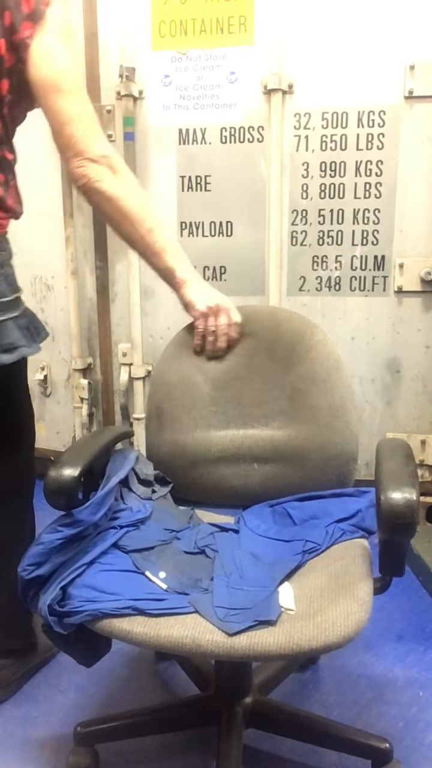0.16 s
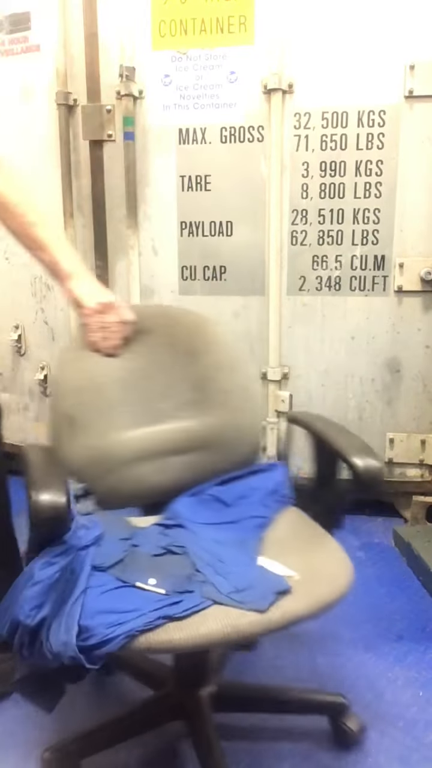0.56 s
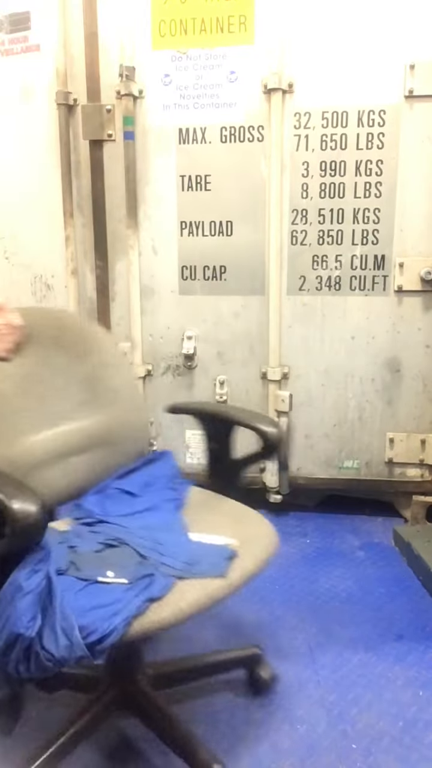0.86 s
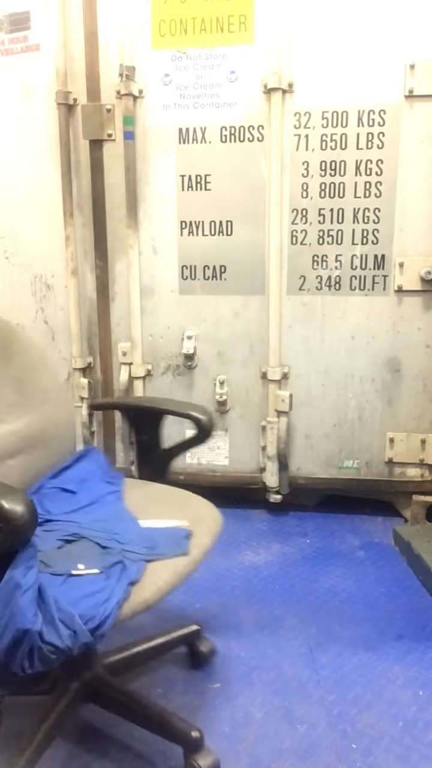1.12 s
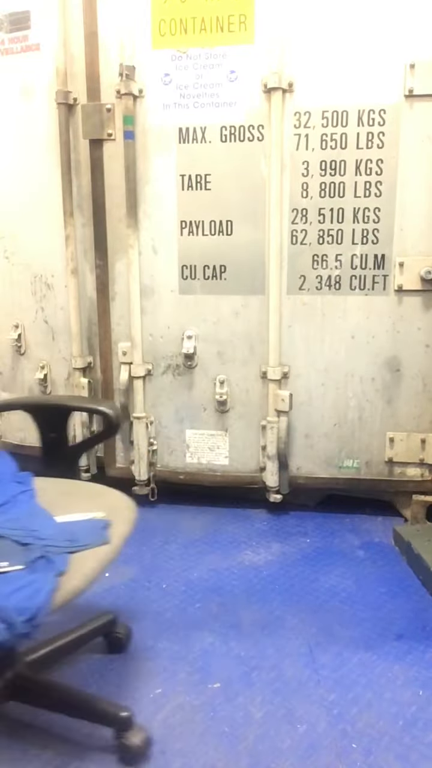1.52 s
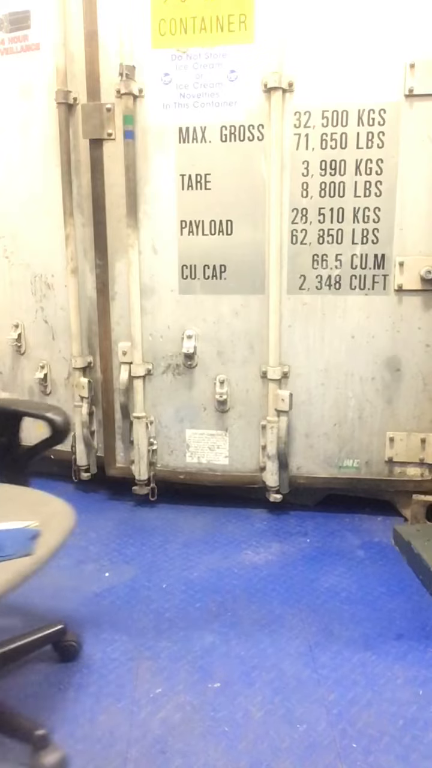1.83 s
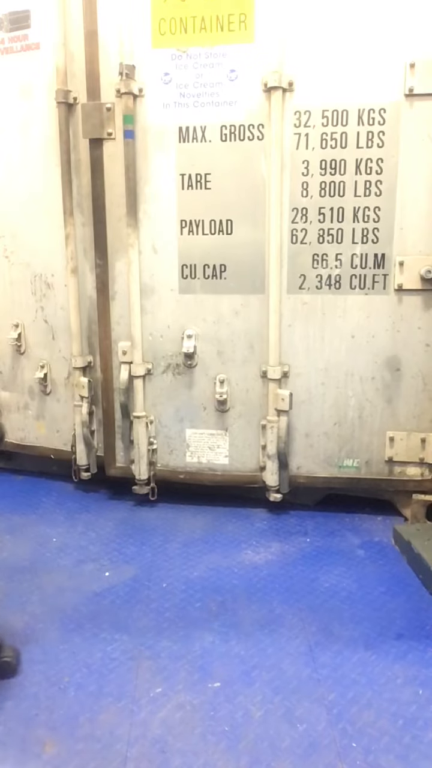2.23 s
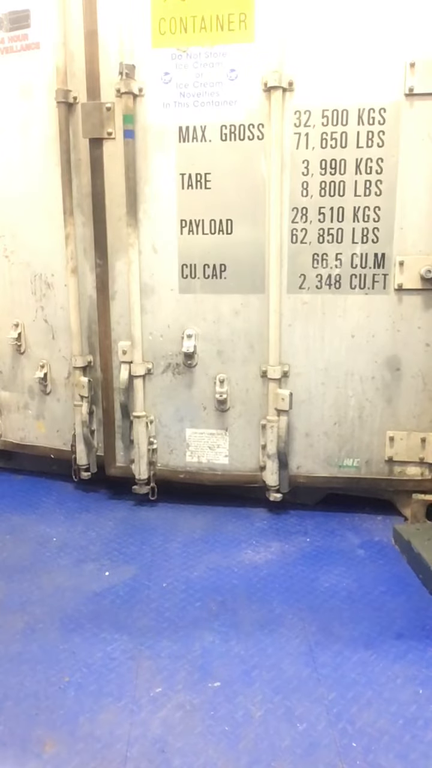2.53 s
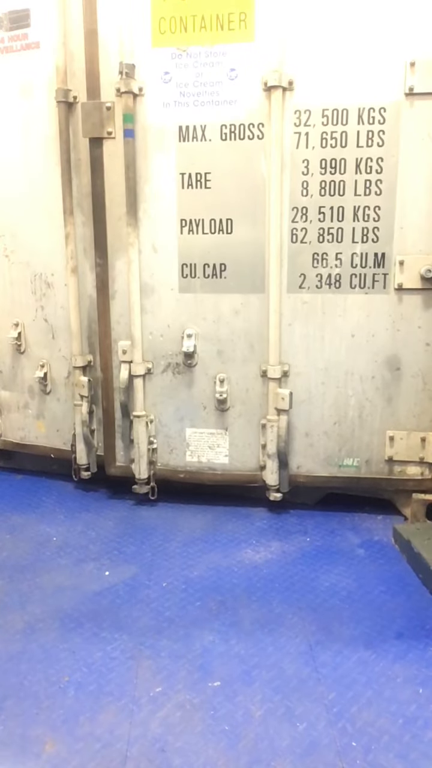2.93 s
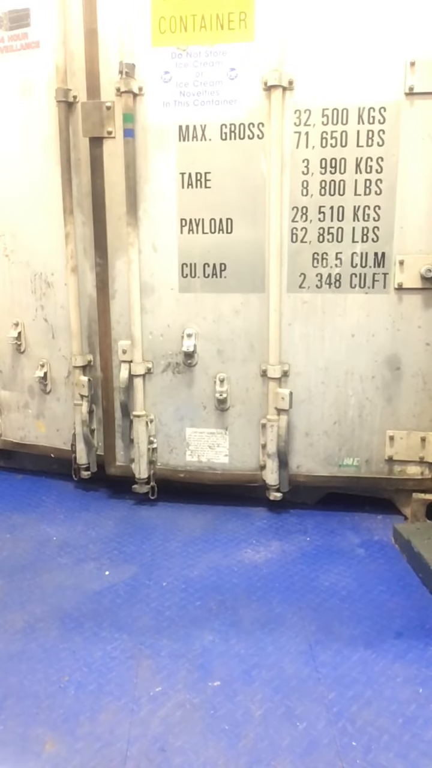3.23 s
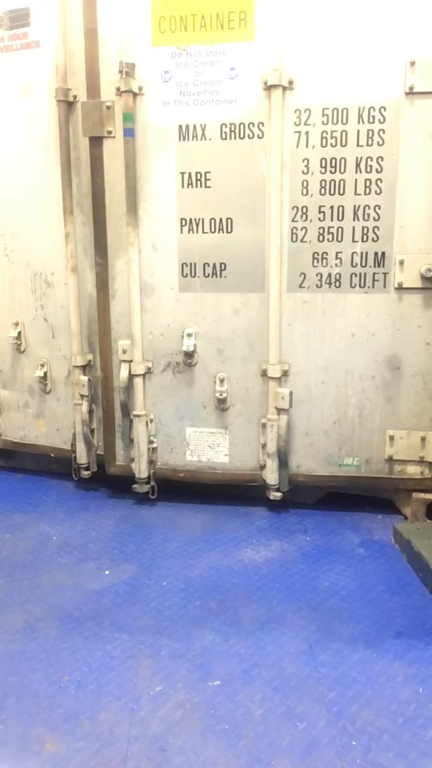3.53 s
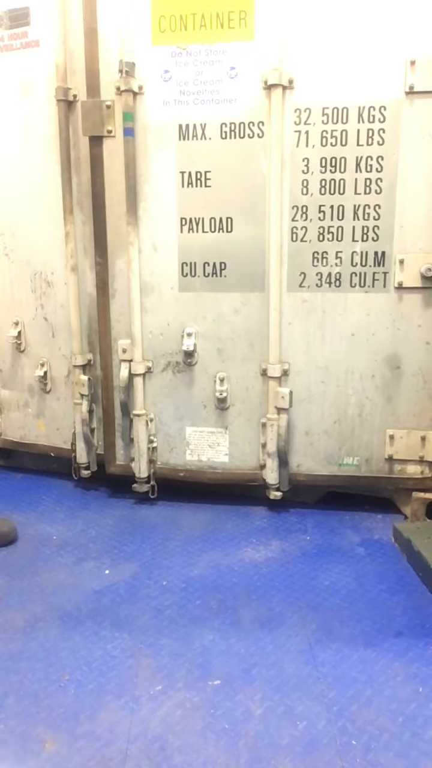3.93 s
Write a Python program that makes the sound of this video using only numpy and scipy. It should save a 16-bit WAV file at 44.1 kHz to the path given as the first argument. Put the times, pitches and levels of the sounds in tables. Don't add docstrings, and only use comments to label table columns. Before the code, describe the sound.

An office chair on hard plastic casters is pulled over a studded floor in a hard-walled store room. Low thuds, hollow knocks and rattling axles come densely, with brief squeaks and ticks. After about three seconds the rolling dies, loose parts settle with a small final knock, and low rumble and air remain. A phone microphone hears little deep bass.

```python
import sys
import numpy as np
from scipy import signal
from scipy.fft import rfft, irfft, next_fast_len
from scipy.io import wavfile
from scipy.ndimage import uniform_filter1d, map_coordinates

SR = 44100
rng = np.random.default_rng(int(sys.argv[2]) if len(sys.argv) > 2 else 0)


def log_audio(samples):
    frames = np.atleast_2d(samples).T
    limited = np.clip(frames, -1, 1)
    pcm = np.round(limited * 32767).astype(np.int16)
    wavfile.write(sys.argv[1], SR, pcm)


def voltage_ratio(level):
    return 10 ** (np.asarray(level, float) / 20)


N = 179090
TIME_S = np.arange(N) / SR


def unit(x):
    return x / np.sqrt(np.mean(x ** 2) + 1e-20)


def along(points, hz):
    f, v = np.transpose(points)
    return np.interp(np.log(hz + 1), np.log(f + 1), v)


def curves(rows, before=None, after=None):
    s, *columns = np.transpose(rows)
    return [np.interp(TIME_S, s, c, before, after) for c in columns]


def wobble(rate_hz):
    knots = rng.standard_normal(int(N * rate_hz / SR) + 4)
    return map_coordinates(knots, [np.arange(N) * rate_hz / SR])


def filtered(x, response):
    m = next_fast_len(N + SR // 2)
    return irfft(rfft(x, m) * response(np.fft.rfftfreq(m, 1 / SR)), m)[..., :N]


def modes(table):
    def response(f):
        total = 0
        for k, (hz, width_hz, db) in enumerate(table):
            resonance = 1j * f * width_hz / (hz * hz - f * f + 1j * f * width_hz)
            total = total + (-1) ** k * voltage_ratio(db) * resonance
        return total
    return response


def band(x, lo_hz, hi_hz):
    return signal.sosfilt(signal.butter(2, [lo_hz, hi_hz], "band", fs=SR, output="sos"), x)


def hiss(spectrum, patchy_db):
    z = signal.stft(rng.standard_normal(N + 512), nperseg=512)[2]
    field = uniform_filter1d(rng.standard_normal(z.shape), 12, 0)
    field = unit(uniform_filter1d(field, 5, 1))
    x = signal.istft(z * voltage_ratio(patchy_db * field), nperseg=512)[1][:N]
    return unit(filtered(x, lambda hz: voltage_ratio(along(spectrum, hz))))


def wavering(hz, drift_hz, sway_db, rate_hz):
    strength = np.sqrt(2) * voltage_ratio(sway_db * wobble(rate_hz))
    return strength * np.sin(2 * np.pi * np.cumsum(hz + drift_hz * wobble(rate_hz)) / SR)


def swells(rows):
    power = np.zeros(N)
    for s, db, rise_s, fall_s in rows:
        before = (s - TIME_S) / max(rise_s, .001)
        after = (TIME_S - s) / max(fall_s, .001)
        power += voltage_ratio(2 * db - 20 * np.where(TIME_S < s, before, after))
    return np.sqrt(power)


# (frequency [Hz], density [dB per Hz])
RUMBLE_SPECTRUM = [(38, -46), (65, 3), (140, 1), (190, -7.5), (250, -11), (420, -120)]
# (frequency [Hz], density [dB per Hz])
AIR_SPECTRUM = [(88, -47), (150, -1.5), (333, 0.5), (896, -14), (1070, -12), (2560, -26.5), (3780, -25.5),
                (4160, -31), (5460, -30.5), (10200, -36), (14400, -34), (15600, -47)]
# (time [s], peak [dB], rise for 10 dB [s], fall for 10 dB [s])
HUM_SWELLS = [(1.59, -49, 0.11, .1), (1.82, -55, .06, 0.7), (2.57, -50, .04, -1.2),
              (2.82, -46.5, 0.095, .2), (3.95, -49.5, 0.58, 1.5)]
# (frequency [Hz], width [Hz], level [dB])
MACHINE_MODES = [(719, 47, -7), (915, 340, -15.5), (240, 58, -6)]
# (time [s], level [dB])
DRONE_LEVEL = [
    (3.3, -90),
    (3.55, -68),
    (4.06, -64.5),
]
# (time [s], pitch [Hz], level [dB])
WHINE_TRACK = [
    (3.45, 880, -100),
    (3.54, 865, -69),
    (3.62, 840, -67),
    (3.72, 825, -68),
    (3.82, 870, -82),
    (4.06, 840, -99),
]


def background():
    lift_db = -4.5 + 1.5 * TIME_S
    rumble = voltage_ratio(-57.5 + lift_db + 4.1 * wobble(9.8)) * hiss(RUMBLE_SPECTRUM, patchy_db=2.5)

    air = hiss(AIR_SPECTRUM, patchy_db=0.4)
    low_air = filtered(air, lambda f: 1 / (1 + (f / 1480) ** 2))
    treble_db = 2.5 + 1.02 * TIME_S
    air = voltage_ratio(-67) * (low_air + voltage_ratio(treble_db) * (air - low_air))

    hum = wavering(55, drift_hz=3.58, sway_db=0.0, rate_hz=13)
    hum = np.hypot(voltage_ratio(-69), swells(HUM_SWELLS)) * voltage_ratio(-5.0) * hum

    drone_db, = curves(DRONE_LEVEL)
    drone = unit(filtered(rng.standard_normal(N), lambda f: modes(MACHINE_MODES)(f) ** 2))
    whine_hz, whine_db = curves(WHINE_TRACK)
    whine = wavering(whine_hz, drift_hz=34.6, sway_db=3, rate_hz=80)
    return rumble + air + hum + voltage_ratio(drone_db) * drone + voltage_ratio(whine_db - 3.0) * whine


# (frequency [Hz], t60 [s])
WALL_DECAY = [(200, 1), (2000, 0.3), (10000, 0.4)]


def walls(x):
    hz, t, z = signal.stft(rng.standard_normal(SR // 2), SR, nperseg=256)
    decay = voltage_ratio(-60 * t / along(WALL_DECAY, hz)[:, None])
    tail = signal.istft(z * decay, SR, nperseg=256)[1]
    delayed = np.pad(x, (500, 0))
    return signal.fftconvolve(delayed, tail / np.linalg.norm(tail))[:N]


def stud_hits(per_s, spread_db, rough):
    when = rng.random(N)
    size = np.clip(rng.standard_normal(N), -2, 2)
    hits = (when < per_s / SR) * voltage_ratio(spread_db * size) * rng.choice([-1, 1], N)
    return unit(hits) + rough * rng.standard_normal(N)


def rattle_grains(centre_hz, octaves, cycles, spread_db, tilt_db, count):
    place = rng.random(count)
    pitch, size, life = np.clip(rng.standard_normal((3, count)), -2, 2)
    hz = centre_hz * 2 ** (octaves * pitch)
    k = np.arange(SR // 110)
    turns = hz[:, None] * k / SR
    fade = np.exp(-turns / (cycles * np.exp(0.54 * life))[:, None]) * (1 - np.exp(-turns))
    rings = voltage_ratio(spread_db * size + tilt_db * pitch)[:, None] * fade * np.sin(2 * np.pi * turns)
    samples = (place * N).astype(int)[:, None] + k
    return unit(np.bincount(samples.ravel(), rings.ravel())[:N])


# (time [s], rolling force [dB], axle play [dB])
ROLL = [(0.132, -57, -15), (.2, -44.5, -14), (.31, -41.5, -8), (.37, -45.5, -7), (.59, -33, -8),
        (.72, -34.5, -3.5), (.83, -38.5, -7), (1.08, -40.5, -3.5), (1.2, -43.5, -6.5), (1.37, -42.5, -11.5),
        (1.58, -45.5, -5), (1.95, -38.5, -5.5), (2.23, -39.5, -10.5), (2.39, -44.5, -11.5),
        (2.7, -41.5, -4), (2.98, -46, -10), (3.24, -52.5, -6.5), (3.45, -67, -8.5)]
# (frequency [Hz], width [Hz], level [dB])
BASE_MODES = [(204, 51, -3), (280, 63.7, -1), (346.6, 73.6, -1.5), (457, 102, -6.5), (535, 54.4, -10)]
# (frequency [Hz], width [Hz], level [dB])
WHEEL_MODES = [(633, 107, 3.5), (800, 269, 2.5), (789, 232, 1.5), (1043, 54, -9)]
# (frequency [Hz], width [Hz], level [dB])
HOLLOW_MODES = [(920, 880, -2.5), (1370, 156, 3.5), (1770, 220, 3), (2270, 730, -1.5), (2780, 430, 1),
                (4140, 250, -4), (4630, 790, -13)]
# (frequency [Hz], density [dB per Hz])
TREAD_SPECTRUM = [(2060, -7.5), (3500, 3), (4040, 2.5), (4730, -3), (5590, -3), (5880, -4), (6920, -1.5),
                  (8350, -6.5), (12100, -9.5), (15600, -21)]
# (time [s], peak [dB], rise for 10 dB [s], fall for 10 dB [s])
SKIDS = [(.19, -51, 0.016, 0.09), (.375, -49.5, 0.009, 0.12), (.44, -59, .015, 0.08),
         (.72, -57, 0.17, -0.12), (.83, -57, 0.025, 0.1), (.99, -47.5, 0.029, 0.17),
         (1.45, -58.5, 0.088, 0.8), (1.77, -53, 0.0082, -0.23), (1.93, -46, 0.044, 0.07),
         (2.11, -53.5, 0.0032, 0.05), (2.7, -54.5, 0.17, 0.2), (3.12, -63, 0.027, 0.07)]


def rolling():
    force_db, = curves([row[:2] for row in ROLL], -120, -120)
    play_db = curves(ROLL)[1]
    loose = voltage_ratio(force_db + play_db)
    jolt, flicker = wobble(26.06), wobble(90)
    sway_db = 1.1 * jolt

    studs = stud_hits(per_s=220, spread_db=3, rough=.8)
    drum = unit(filtered(studs, lambda f: modes(BASE_MODES)(f) * f / (f - 120j)))
    drum = voltage_ratio(force_db + sway_db) * drum
    rumble = voltage_ratio(force_db - 13 + 4.3 * wobble(7.65)) * hiss(RUMBLE_SPECTRUM, patchy_db=0.5)

    knock_db = force_db.max() + 0.89 * (force_db - force_db.max()) - 11.5
    wheel_hits = studs + stud_hits(per_s=240, spread_db=4.0, rough=0.61)
    knock = unit(filtered(wheel_hits, modes(WHEEL_MODES)))
    knock = voltage_ratio(knock_db + 1.0 + 2 * sway_db) * knock

    shaken = swells([(s, db - 14, .003, 0.29 / 6) for s, db, _ in AXLE_KNOCKS])
    rattle = rattle_grains(centre_hz=2295, octaves=0.642, cycles=5.4, spread_db=2.5, tilt_db=-0.5, count=5000)
    rattle = rattle + voltage_ratio(-4.5) * walls(rattle)
    rattle = unit(filtered(rattle, lambda f: 0.65 + abs(modes(HOLLOW_MODES)(f))))
    rattle = np.hypot(loose, shaken) * voltage_ratio(-3.5 + jolt / 2 + 1.5 * flicker) * rattle

    skids = swells(SKIDS) * (force_db > force_db.min())
    scuff = np.hypot(voltage_ratio(-17.5) * loose, skids) * voltage_ratio(-1.5 + jolt / 2 + 1.7 * flicker)
    scuff = scuff * hiss(TREAD_SPECTRUM, patchy_db=1.3)
    return drum + rumble + knock + rattle + scuff


def struck_rings(rows, rough, rise_s, wide=.47):
    out, t = np.zeros(N + SR), np.arange(SR // 8) / SR
    for s, db, hz, t60 in rows:
        neighbours = unit(band(rng.standard_normal(len(t)), (1 - wide) * hz, (1 + wide) * hz))
        ring = np.sin(2 * np.pi * hz * t) + rough * neighbours
        envelope = voltage_ratio(db - 5.5 - 60 * t / t60) * (1 - np.exp(-t / rise_s))
        out[round(s * SR):][:len(t)] += envelope * ring
    return out[:N]


# (time [s], peak [dB], pitch [Hz])
AXLE_KNOCKS = [(0.134, -52, 1150), (0.18, -31.5, 695), (.195, -36.5, 1370), (0.228, -39, 1060),
               (.298, -33.5, 810), (.392, -35.5, 1750), (.436, -29, 1690), (1.377, -51, 786),
               (.546, -31.5, 1830), (0.623, -37, 1740), (.855, -34, 1370), (2.177, -36.5, 2220),
               (.977, -34, 950), (1.02, -36, 1825), (1.247, -38, 1690), (1.403, -36.5, 773),
               (1.478, -33, 1010), (1.572, -45, 1750), (1.628, -37.5, 1470), (1.81, -33.5, 2460),
               (1.905, -32, 1468), (2.011, -49, 1050), (2.104, -39.5, 1960), (2.394, -45, 920),
               (2.268, -36.5, 1420), (2.493, -42.5, 1324), (2.544, -34, 2125), (2.586, -36.5, 1370),
               (2.787, -35, 994), (2.885, -41.5, 917)]


def axle_knocks():
    return struck_rings([(*row, 0.064) for row in AXLE_KNOCKS], rough=.8, rise_s=.0008)


# (time [s], peak [dB], pitch [Hz])
THUDS = [(.154, -28.5, 240), (.162, -25.5, 218), (0.5487, -22, 399), (.298, -20.5, 283),
         (0.393, -23.5, 236), (0.423, -24.5, 291), (.462, -11.5, 280), (.571, -21.5, 290),
         (.603, -19.5, 286), (.624, -13.5, 359), (.69, -17.5, 265), (.709, -26, 244), (1.026, -20.5, 391),
         (1.038, -21, 240), (1.116, -25.5, 313), (1.242, -22, 241), (1.406, -19.5, 243), (1.7, -27.5, 278),
         (1.799, -27.5, 248), (3.204, -44, 384), (1.902, -18, 281), (1.917, -16, 273), (2.062, -32, 278),
         (2.102, -26.5, 280), (2.22, -23, 320), (2.538, -28.5, 358), (2.785, -27.5, 363), (2.888, -24, 251),
         (2.951, -30, 258), (3.046, -35.5, 359)]
# (time [s], peak [dB], pitch [Hz])
STOPS = [
    (3.797, -33.5, 266),
    (3.944, -37, 377),
]


def thuds():
    out, t = np.zeros(N + SR), np.arange(SR // 5) / SR
    rows = [(s, db, hz, 0.057 * voltage_ratio(-0.21 * (db + 25.5))) for s, db, hz in THUDS]
    rows += [(*row, 0.033) for row in STOPS]
    for s, db, hz, t60 in rows:
        ring = np.sin(2 * np.pi * hz * t) + 0.38 * np.sin(2 * np.pi * 1.427 * hz * t)
        envelope = voltage_ratio(db - 0.5 - 60 * t / t60) * (1 - np.exp(-t / 0.0024))
        edge = unit(band(rng.standard_normal(len(t)), 470, 724)) * voltage_ratio(-18.5 - 60 * t / 0.072)
        out[round(s * SR):][:len(t)] -= envelope * ring + voltage_ratio(db) * edge
    return out[:N]


# (time [s], peak [dB], brightness [dB])
TICKS = [(0.155, -49.5, 4.5), (0.1895, -30.5, 1), (0.206, -37, -2), (.3751, -47, -12), (0.4414, -34, -1),
         (0.5436, -42, -9), (0.623, -39.5, -21), (0.689, -43, -13), (0.7244, -44, -19), (.855, -39, -4),
         (0.911, -41, -17), (0.946, -47, 5), (.976, -37, 4), (1.216, -61, -3), (1.244, -58, -23.5),
         (1.388, -52, 1), (1.415, -48, -19), (1.4777, -43.5, -2), (1.573, -47, -3), (1.6379, -36.5, -9),
         (1.7264, -50, 8), (1.7648, -40, 9), (1.809, -48, -17), (1.9259, -45, -23.5), (2.5461, -58, -13),
         (2.306, -44.5, -7), (2.494, -54, -19.5), (2.7006, -47, -21), (2.8994, -59, -23)]
# (time [s], peak [dB], brightness [dB])
SETTLING = [
    (3.105, -59, -15),
    (3.1997, -47.5, 5.5),
    (3.299, -71, -18),
    (3.5127, -58, 2),
    (3.5698, -47, -5),
    (3.654, -58, 3),
    (3.706, -58, 3),
    (3.7414, -67, 13),
    (3.797, -50, -2.5),
    (3.9417, -57, -14),
]
# (time [s], peak [dB], brightness [dB], t60 [s])
SNAP = [
    (2.1038, -39, 7.5, 0.29),
]
# (frequency [Hz], width [Hz], level [dB])
STEM_MODES = [(3970, 180, -1.5), (6900, 150, -7.5), (9280, 440, 0.5), (11900, 570, 2.5)]


def ticks():
    out, t = np.zeros(N + SR), np.arange(SR // 4) / SR
    rows = [(*row, 0.098) for row in TICKS] + [(*row, 0.14) for row in SETTLING] + SNAP
    for s, db, tilt_db, smear_s in rows:
        t60 = smear_s * voltage_ratio(-0.18 * tilt_db)
        noise = rng.standard_normal((3, len(t)))
        dull = voltage_ratio(-1.5 - tilt_db) * unit(band(noise[0], 1270, 2980))
        middle = unit(band(noise[1], 4400, 8450))
        bright = voltage_ratio(-5.5 + tilt_db) * unit(band(noise[2], 6500, 15000))
        decay = voltage_ratio(-60 * t / t60) + 0.75 * voltage_ratio(-60 * t / 0.012)
        decay = decay * (1 - np.exp(-t / 0.00049))
        out[round(s * SR):][:len(t)] += voltage_ratio(db - 14.0) * decay * (dull + middle + bright)
    return filtered(out[:N], lambda f: 0.77 + sum(modes([row])(f) for row in STEM_MODES))


# (time [s], peak [dB], pitch [Hz])
PIN_CLICKS = [(.1896, -45, 11800), (.206, -44, 11700), (.4396, -37.5, 9330), (.5309, -54, 9400),
              (0.598, -46, 11900), (.675, -49, 9300), (.7099, -49, 12500), (0.8274, -50, 12200),
              (1.1744, -59, 12600), (1.216, -55, 12500), (1.3126, -59, 11500), (2.1055, -42, 14500),
              (2.112, -38, 8500), (2.357, -59, 10500), (2.5987, -63, 11600), (2.6186, -54, 9500),
              (2.6715, -56, 11000), (3.4505, -70, 11900), (3.461, -77, 11400), (3.5131, -53, 12500),
              (3.5695, -58, 4430), (3.5875, -57.5, 9300), (3.654, -59, 10500), (3.828, -62, 9150)]


def pin_clicks():
    return struck_rings([(*row, 0.024) for row in PIN_CLICKS], rough=1.6, rise_s=.0002, wide=.25)


# (time [s], peak [dB], pitch [Hz], t60 [s])
HOLLOW_KNOCKS = [
    (.688, -26, 1396, 0.031),
    (1.053, -29.5, 1977, .05),
    (3.568, -49, 1270, .044),
    (3.9415, -39, 814, 0.017),
    (3.9465, -34, 663, 0.022),
]


def hollow_knocks():
    return struck_rings(HOLLOW_KNOCKS, rough=.35, rise_s=.001)


# (time [s], peak [dB], pitch [Hz], t60 [s])
SQUEAKS = [(0.8015, -38, 3680, 0.051), (0.8235, -38, 3650, 0.026), (0.8904, -31, 2820, 0.041),
           (1.051, -30, 4010, 0.038), (1.4874, -42, 4070, 0.019), (2.9831, -43, 3520, 0.027),
           (3.2637, -47, 3050, 0.037), (3.4236, -55, 3470, 0.019), (3.5705, -51, 3740, 0.074)]


def squeaks():
    return struck_rings(SQUEAKS, rough=.4, rise_s=.003)


def scene():
    struck = axle_knocks() + thuds() + ticks() + pin_clicks() + hollow_knocks() + squeaks()
    return (background() + rolling() + struck + voltage_ratio(-6.5) * walls(struck))[None]


def top_cut(x):
    return signal.sosfilt(signal.butter(12, 16500, fs=SR, output="sos"), x)


def record(dry):
    bass_cut = signal.butter(3, 50, "high", fs=SR, output="sos")
    mix = filtered(signal.sosfilt(bass_cut, dry), lambda hz: np.where(hz < 15850, 1, voltage_ratio(-34)))
    return top_cut(mix)


dry = scene()
out = record(dry)
log_audio(out)
```